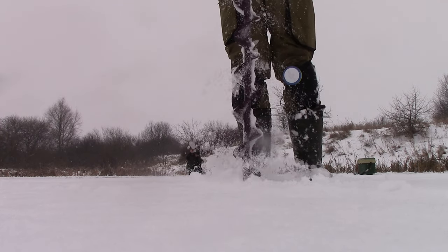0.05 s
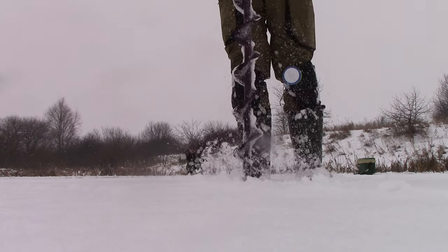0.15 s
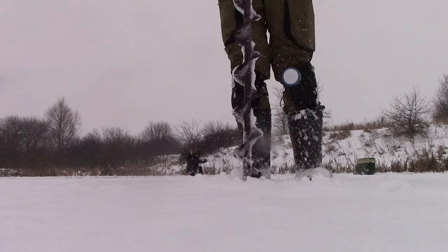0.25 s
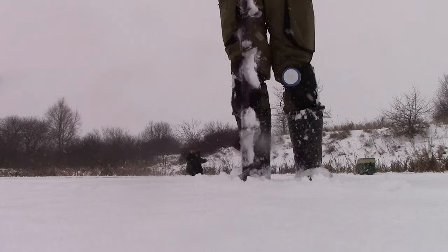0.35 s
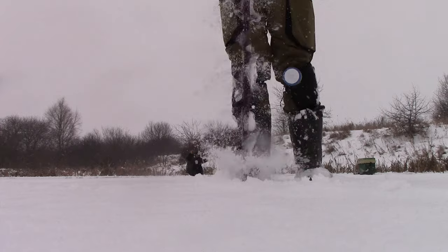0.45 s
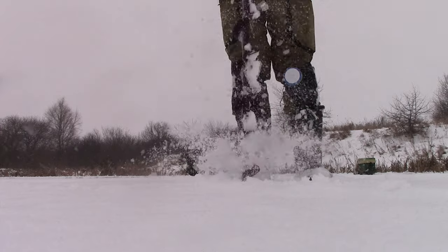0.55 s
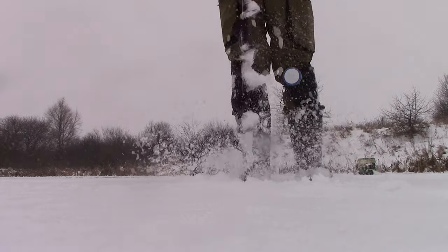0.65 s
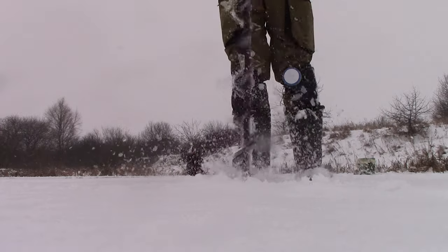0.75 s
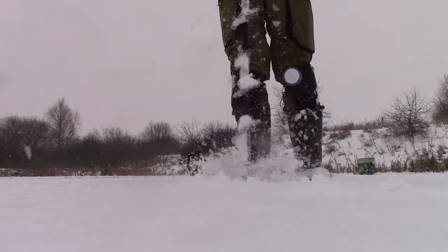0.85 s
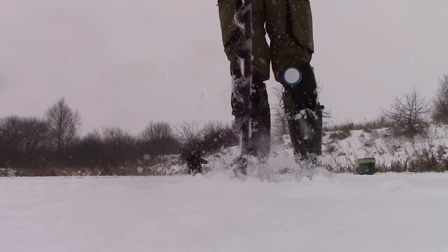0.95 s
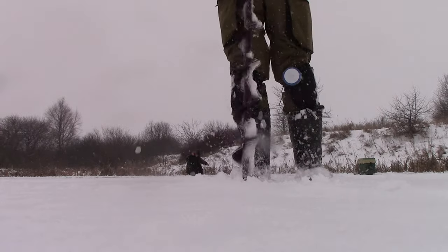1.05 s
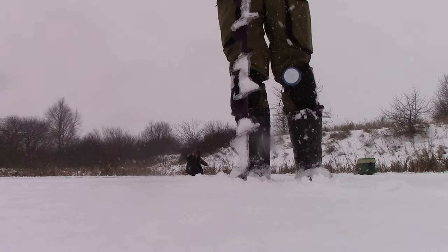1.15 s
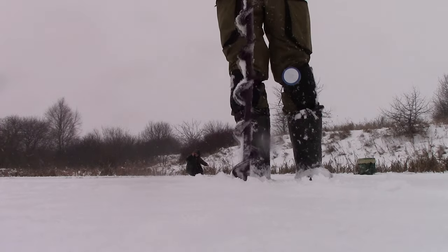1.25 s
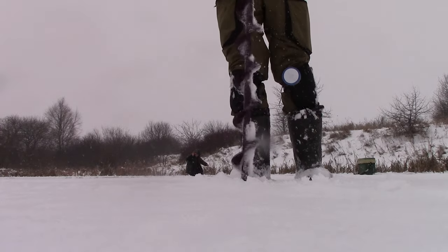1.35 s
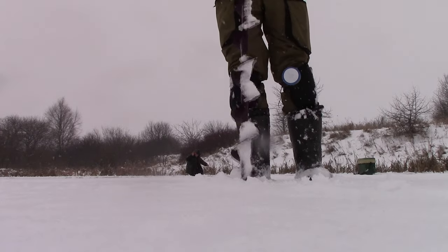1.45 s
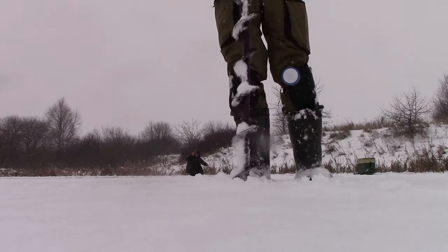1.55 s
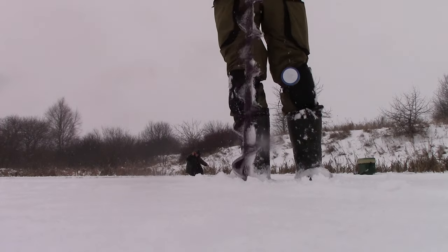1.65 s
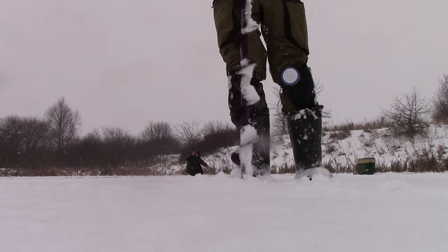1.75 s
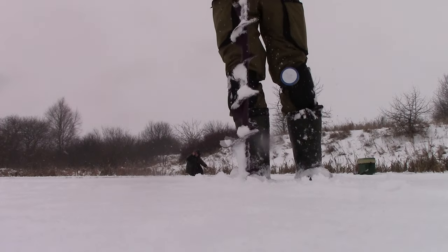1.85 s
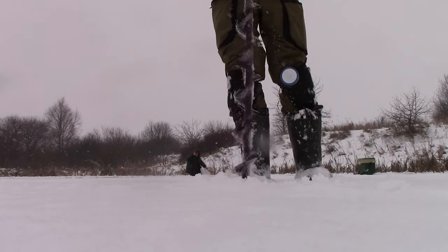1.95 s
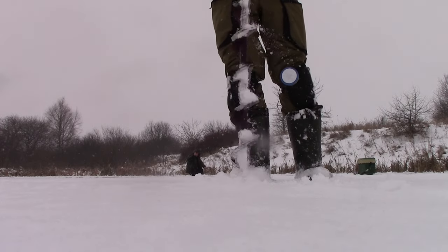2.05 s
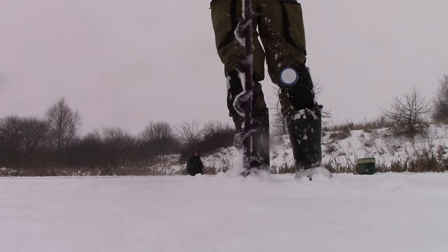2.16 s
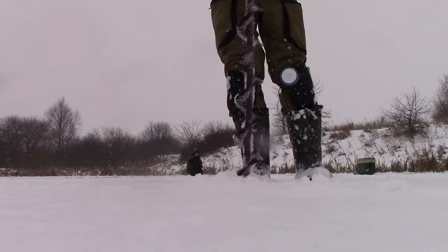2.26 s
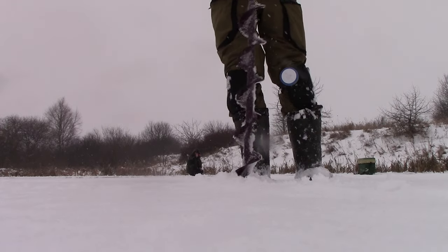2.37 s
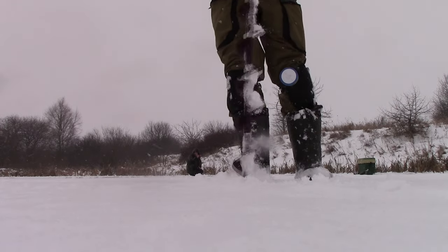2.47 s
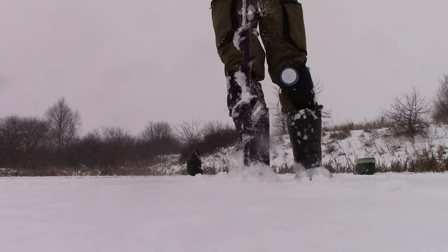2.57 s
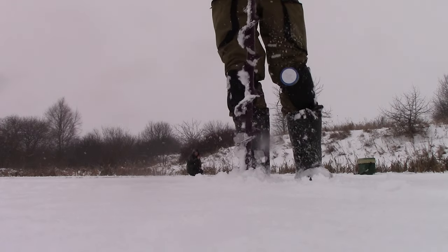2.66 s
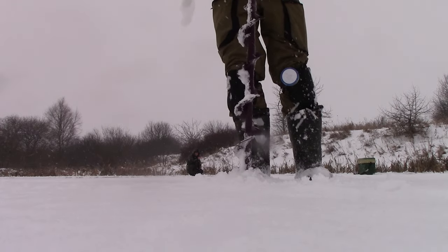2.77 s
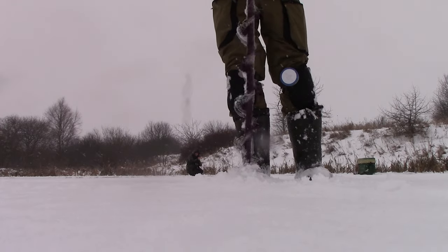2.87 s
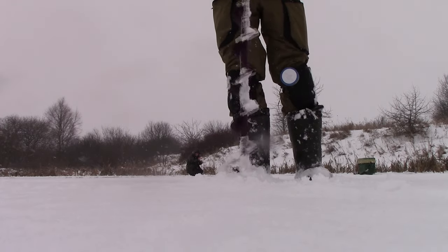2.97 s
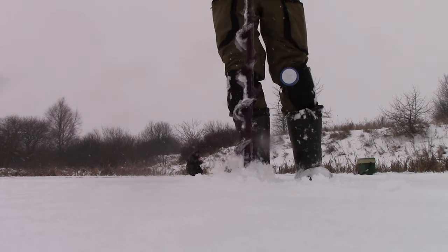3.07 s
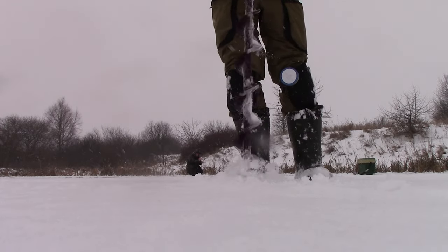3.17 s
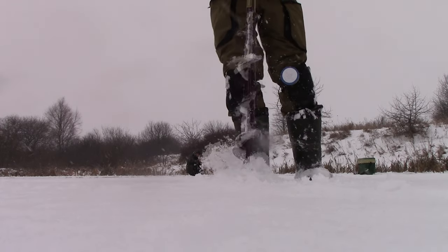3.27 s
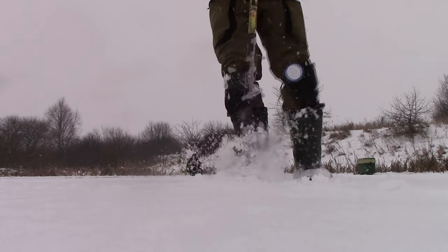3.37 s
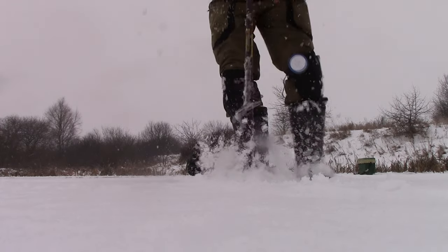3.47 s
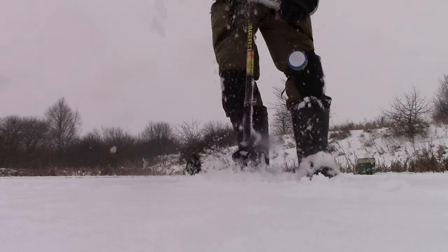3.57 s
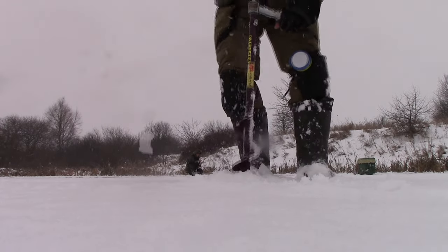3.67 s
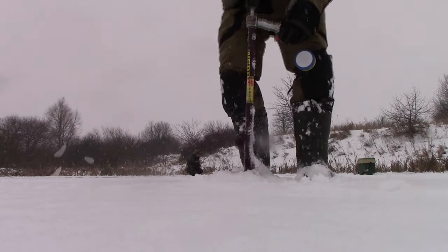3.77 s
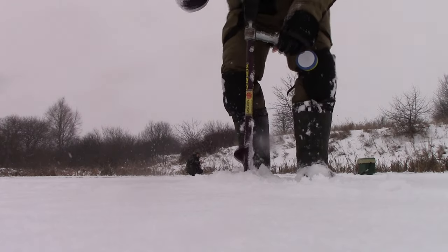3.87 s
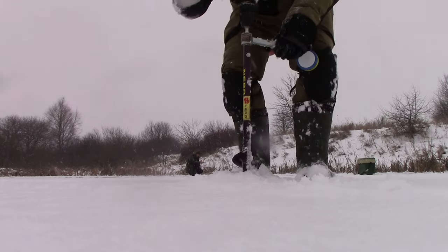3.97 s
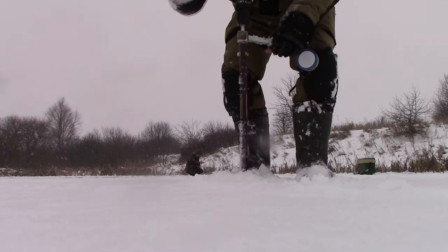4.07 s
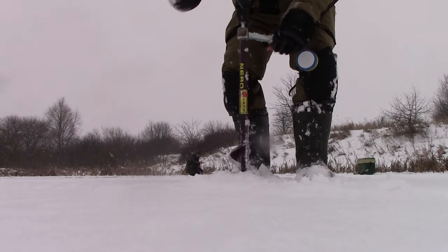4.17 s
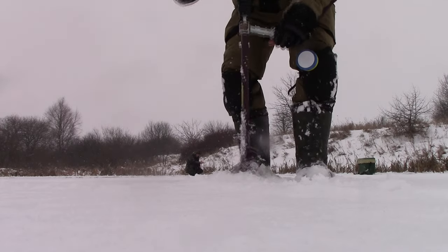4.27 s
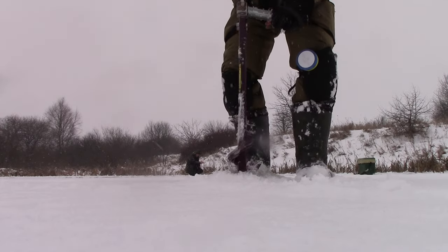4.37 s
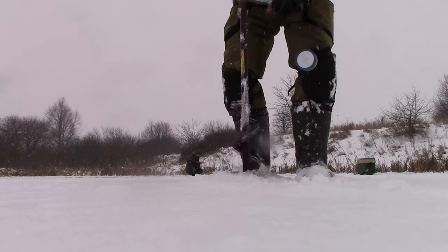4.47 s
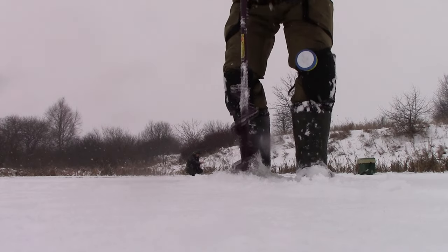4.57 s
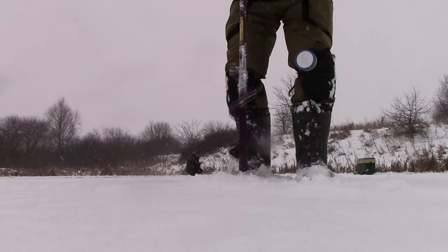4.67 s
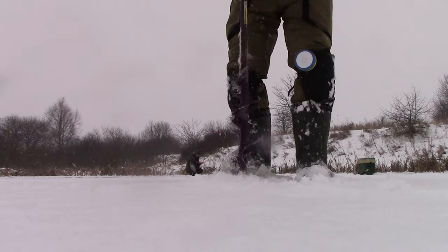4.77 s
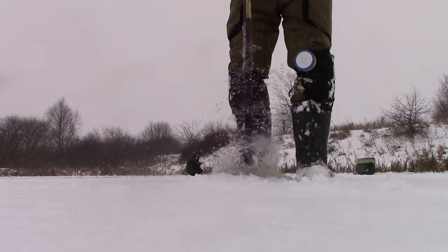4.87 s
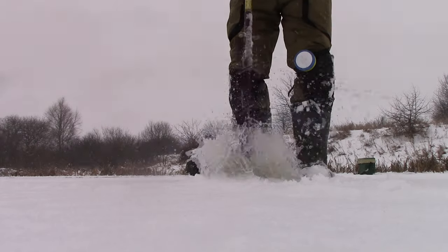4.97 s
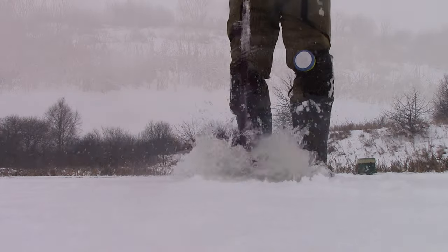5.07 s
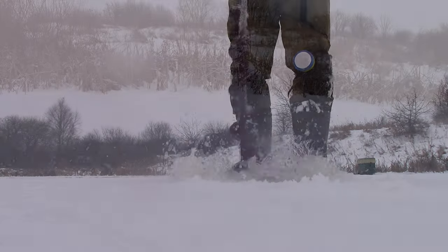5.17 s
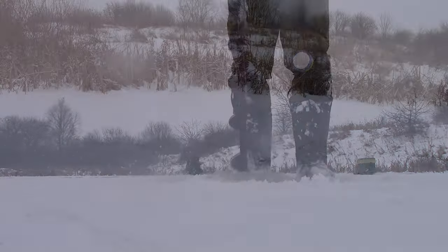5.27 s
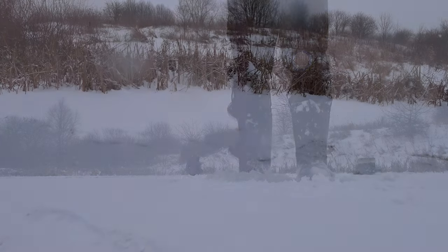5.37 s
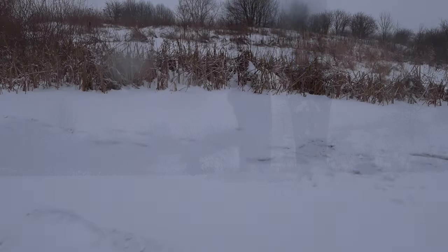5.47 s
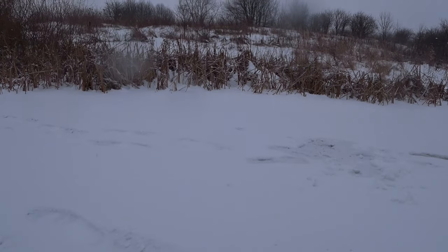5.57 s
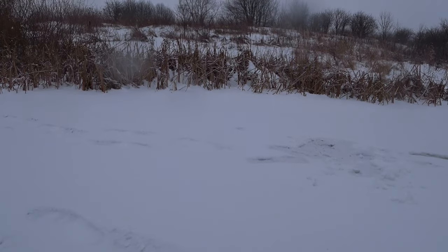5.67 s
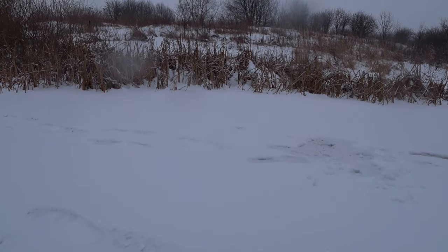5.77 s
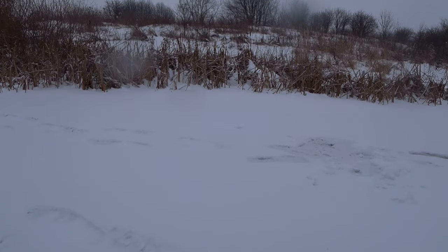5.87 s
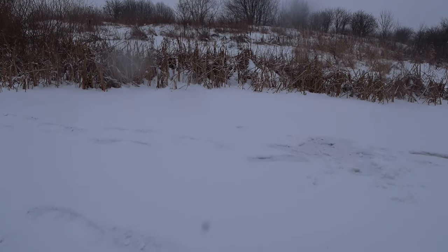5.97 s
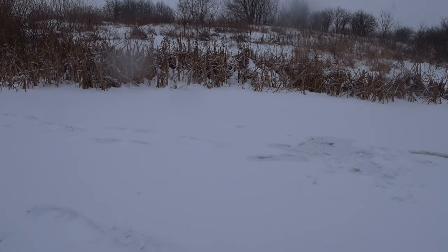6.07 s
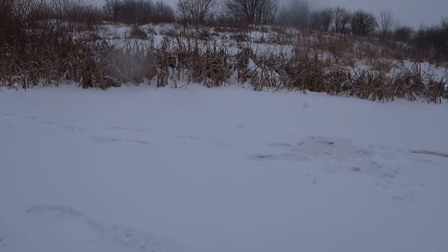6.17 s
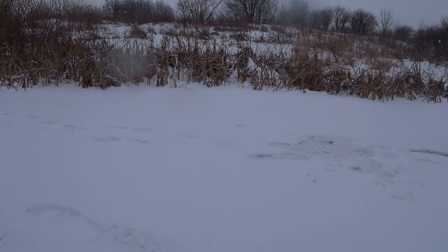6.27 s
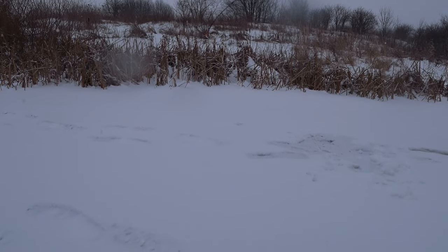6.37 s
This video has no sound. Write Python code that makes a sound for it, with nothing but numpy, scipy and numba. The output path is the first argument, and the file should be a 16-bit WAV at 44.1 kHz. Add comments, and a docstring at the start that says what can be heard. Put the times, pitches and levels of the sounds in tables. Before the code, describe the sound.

A close, dry outdoor sound on a snow-covered pond, slightly left of centre. From 0 to 0.6 s a hand auger gives short, gritty scrapes and small ticks. From about 0.65 to 2.3 s one long grinding stroke crunches through ice, swelling and easing, with steely rasp, bright tinkling chips and a growing hollow ring; a sharp crack snaps at 1.8 s. Around 2.3 to 2.6 s the blade sticks and stutters, breaking free with a hard crack near 2.5 s. After a brief lull, a final rasp runs 2.9 to 3.2 s, then breakthrough: gurgling slush, splashes, resonant glugs and a thin whistle until 3.6 s. Softer plops and sloshes continue to 4.7 s. A second strong plunge glugs and fizzes from 4.8 to 5.1 s, then dwindling splashes and slush patter until 5.5 s. Low rumble remains, with two soft wind buffets and faint snow ticks, to 6.4 s.

```python
"""A hand auger is turned in strokes into pond ice: random clicks, the chips, excite resonances of steel and hole.
A stuck blade breaks free now and then with a crack. The auger breaks through and is plunged up and down:
ringing air pockets glug, click clouds fizz through short echoes, a thin tone whistles, slush splashes on snow.
A low noise rumble rises during the last plunges and is left over the quiet pond, with two soft wind buffets
and a few ticks of snow. No reverberation is added, for snow gives no echo."""
import sys
import numpy as np
from scipy import signal
from scipy.fft import rfft, irfft
from scipy.io import wavfile
from scipy.ndimage import map_coordinates
from numba import njit

SR = 44100
rng = np.random.default_rng(int(sys.argv[2]) if len(sys.argv) > 2 else 0)


def transcribe(u):
    """Save the signal u as a 16-bit wav file named by the first command-line argument.

    u: samples, shape (n,) or (channels, n), limited to [-1, 1]; the rate is SR.
    q: integer samples, one column per channel.
    """
    v = np.clip(np.atleast_2d(u).T, -1, 1)
    q = np.round(v * 32767).astype(np.int16)
    wavfile.write(sys.argv[1], SR, q)


N = 283122
TIME = np.arange(N) / SR

# Still air over the pond, heard in both ears: (frequency_hz, density_db)
AIR_SPECTRUM = [(20, -17), (90, -20.5), (220, -1.5), (350, -4), (1000, -9), (3000, -16.5), (9000, -20.5),
                (12000, -23), (16000, -43)]
# Faint steady noise, added to the left ear and subtracted from the right: (frequency_hz, density_db)
SIDE_NOISE_SPECTRUM = [(20, -14), (90, -21), (220, -32.5), (350, -5), (2000, 1), (4000, -8), (9000, -16),
                       (16000, -28)]
# Low rumble: (frequency_hz, density_db), and its course: (time_s, gain_db)
RUMBLE_SPECTRUM = [(12, -17), (25, 5.5), (45, -1.5), (65, 2), (90, -1.5), (150, -5), (220, -6.5),
                   (300, -15), (360, -22), (1000, -27.5), (2500, -27), (6000, -28.5), (9500, -35.5),
                   (13000, -30.5), (15500, -32)]
RUMBLE_COURSE = [(4.82, -46), (4.865, -6), (5.0, -14), (5.25, -2), (5.55, 1.5), (6.42, 3.5)]
# Wind buffets: (centre_s, level_db)
WIND_BUFFETS = [(5.584, -43), (5.94, -39)]
# Snow grains ticking close by: (centre_s, level_db)
SNOW_TICKS = [(5.626, -44), (5.79, -48)]
# Level difference between the ears: (frequency_hz, left_minus_right_db)
EAR_DIFFERENCE = [(60, 4.5), (250, 3.5), (500, 2.05), (1000, 2.5), (8000, 3), (13000, 3.5)]

# Water squeezed past the screw whistles thinly: (time_s, pitch_hz, level_db)
WHISTLE_TONE = [(3.41, 2484, -60), (3.43, 3000, -39), (3.45, 3165, -38), (3.49, 3190, -41),
                (3.52, 3070, -59), (3.55, 2700, -44), (3.57, 2460, -35)]
# Lumps of thrown slush fall back on the snow: (start_s, end_s, level_db)
SPATTER_SPELLS = [(3.56, 3.678, -54), (5.24, 5.5, -48)]
# Plunges that churn the slush: (start_s, end_s, attack_s, settling_s, gurgle_db, fizz_db, grains_db,
# first_echo_spacing_hz, last_echo_spacing_hz)
PLUNGE_STROKES = [(3.194, 3.51, 0.062, 0.15, -25.5, -34.5, -36.5, 746, 800),
                  (4.049, 4.298, 0.0073, 0.036, -36.5, -46, -59, 630, 640),
                  (4.38, 4.78, 0.01, 0.03, -51.5, -65.5, -59, 500, 350),
                  (4.776, 5.051, 0.13, 0.27, -31.5, -35.5, -44, 284, 616),
                  (5.209, 5.388, 0.011, 0.027, -52, -49, -50.5, 587, 530)]
# Big air pockets closing: (start_s, level_db, pitch_hz)
AIR_POCKETS = [(3.362, -10.5, 666), (3.392, -13.5, 923), (3.403, -12, 520), (3.42, -18.5, 398),
               (3.523, -8, 609), (3.531, -12, 732), (3.735, -26.5, 606), (3.756, -32.5, 1090),
               (3.797, -31, 600), (3.796, -34, 1500), (3.946, -27.5, 595), (3.97, -32.5, 700),
               (4.027, -36.5, 667), (4.099, -23, 641), (4.152, -17.5, 793), (4.224, -19.5, 860),
               (4.239, -14.5, 914), (4.283, -19.5, 580), (4.539, -35, 513), (4.696, -29, 760),
               (4.795, -15.5, 726), (4.82, -34, 854), (4.8649, -5, 500), (4.886, -17, 1476),
               (4.891, -7.5, 950), (4.891, -14.5, 523), (4.933, -11.5, 795), (4.952, -15, 665),
               (5.009, -16, 680), (5.022, -15, 436), (5.025, -10, 850), (5.084, -17.5, 375),
               (5.1, -22.5, 353), (5.125, -28, 352), (5.168, -30, 389), (5.192, -35, 450),
               (5.238, -21.5, 580), (5.277, -22.5, 624)]
# Splashes of slush: (start_s, length_s, body_db, spray_db)
SPLASH_BURSTS = [(3.301, 0.019, -15.5, -27), (3.332, 0.015, -19, -23), (3.384, 0.046, -24.5, -35),
                 (3.521, 0.02, -26, -41), (3.546, 0.01, -30, -32), (3.586, 0.0034, -25.5, -31),
                 (3.664, 0.013, -46, -56), (3.806, 0.014, -33.5, -42), (3.878, 0.014, -37, -47),
                 (3.933, 0.019, -40.5, -55), (4.091, 0.048, -33, -44.5), (4.147, 0.021, -30.5, -40.5),
                 (4.218, 0.035, -29, -39), (4.278, 0.014, -34.5, -41.5), (4.417, 0.022, -44, -41.5),
                 (4.454, 0.027, -37.5, -48), (4.54, 0.016, -46.5, -53), (4.604, 0.0075, -49.5, -54),
                 (4.647, 0.0087, -54, -54), (4.689, 0.012, -45.5, -44.5), (4.787, 0.011, -31, -31.5),
                 (4.851, 0.017, -22.5, -22), (4.879, 0.017, -26, -30.5), (4.9286, 0.0046, -27, -16),
                 (4.946, 0.026, -28, -28), (5.003, 0.011, -28.5, -28), (5.0192, 0.014, -21, -21),
                 (5.0539, 0.0096, -20.5, -21), (5.084, 0.0059, -38, -35), (5.113, 0.0097, -50, -49),
                 (5.165, 0.0073, -35.5, -34.5), (5.22, 0.0067, -16.5, -34.5), (5.268, 0.017, -29, -44.5),
                 (5.313, 0.015, -33, -49), (5.447, 0.0071, -38.5, -41), (5.503, 0.014, -42, -43.5)]
# Spectra of moving water, of spray and of fizz: (frequency_hz, density_db)
SLOSH_SPECTRUM = [(30, -38.5), (60, -77), (150, -22.5), (250, -8.5), (380, 2), (600, 2.5), (900, 3),
                  (1400, 1), (2200, -12), (3600, -10), (5200, -18), (8000, -20.5), (16000, -36)]
SPRAY_SPECTRUM = [(300, -60.5), (3500, -2), (5200, -15), (7000, -4), (8600, 2.5), (9500, 1.5), (10400, 0),
                  (12000, -8.5), (14000, -26), (16000, -39)]
FIZZ_SPECTRUM = [(100, -55), (800, -18), (1400, -8), (1900, 1.5), (2900, 0), (3700, -5.5), (5200, -12),
                 (7500, -10.5), (16000, -51)]

# Single cracks of the ice under a sticking blade: (start_s, level_db)
ICE_CRACKS = [(0.138, -35.5), (0.194, -29), (0.302, -35.5), (0.57, -21), (1.776, -3), (2.317, -19),
              (2.339, -8), (2.424, -12), (2.432, -18), (2.441, -17), (2.449, -16), (2.471, -15),
              (2.489, -1.5), (2.773, -31)]
# Strokes of the blades, biting or just rubbing: (start_s, end_s, attack_s, level_db, swell_db_per_s,
# treble_relative_db)
BLADE_STROKES = [(0.0, 0.08, 0.001, -30.5, 51, -1.5), (0.351, 0.541, 0.079, -26.5, 35, -2),
                 (0.574, 0.647, 0.017, -44, -47, -4.5), (0.657, 2.294, 0.055, -26, 0, -3),
                 (2.299, 2.329, 0.01, -33.5, -10, -14), (2.336, 2.385, 0.0026, -26, -10, -7),
                 (2.39, 2.49, 0.0077, -35.5, -40, -5.5), (2.49, 2.629, 0.0023, -20.5, -29, -1.5),
                 (2.669, 2.764, 0.025, -44.5, -65, -5), (2.875, 3.216, 0.073, -23, 0.5, -1)]
# Pressure on the auger through the long stroke: (time_s, gain_db)
AUGER_PRESSURE = [(0.66, -1.5), (0.75, 3.5), (0.88, 5.5), (1.03, -1.5), (1.35, -1), (1.62, -2), (1.69, 4),
                  (1.86, -4), (2.04, 4), (2.22, 0), (2.33, -5.5)]
# Hole and ice sheet ring once the blades are deep enough: (time_s, hole_pitch_hz, hole_db, boom_db)
HOLE_COURSE = [(0.8, 720, -23, -19.5), (1.15, 742, -7, -13.5), (1.6, 737, -3, -14.5),
               (2.6, 650, -7.5, -16.5), (3.2, 665, -6, -15)]
# Resonances of the steel shaft and spiral, and of the blades themselves: (centre_hz, width_hz, level_db)
SHAFT_MODES = [(1161, 195, 1), (1333, 120, -4.5), (1560, 137, -0.5), (1694, 72, -2.5), (1880, 290, 3.5),
               (2204, 120, -12.5), (2685, 180, -4), (3043, 130, -4.5), (4620, 520, -4)]
BLADE_MODES = [(3543, 57, -0.5), (3690, 470, 5.5), (3780, 240, -5)]
# Spectra of breaking chips, of bright splinters and of the booming ice sheet: (frequency_hz, density_db)
CHIP_SPECTRUM = [(100, -40.5), (300, -13.5), (460, -7), (600, 0.5), (1000, 0.5), (1700, 1.5), (2300, -0.5),
                 (3200, -1), (4300, -5), (5300, -10), (7000, -32)]
SPLINTER_SPECTRUM = [(300, -89), (4000, -48.5), (5400, -9.5), (6600, -1), (8200, 2), (10000, 2),
                     (11200, -6), (12500, -14.5), (14000, -22), (16000, -42.5)]
BOOM_SPECTRUM = [(50, -54), (100, -39), (165, -10), (280, 0.5), (380, 1.5), (460, -10), (900, -44.5)]

BITE_POWER = 1.27  # exponent of the attack: the blades dig in slowly at first
RELEASE_S = 0.0079  # and let go quickly
TREBLE_DB_PER_S, BLADE_DB_PER_S = -1.06, -2.5  # the treble and the blade ring sink with the auger
BLADE_START_DB = -4.5  # blade ring at time 0, relative to the stroke
GURGLE_ATTACK_S, FIZZ_RELEASE_S, GRAIN_RELEASE_S = 0.027, 0.028, 0.1
ECHO_SHARE = 0.46  # of the fizz amplitude that returns from each bounce
GLUG_CYCLES = 26.8  # 60 dB decay in periods of the starting pitch, so low pockets last longer
CUTOFF_HZ = 15900


def undb(db):
    """Logarithmic level: decibels to amplitude gain."""
    return 10 ** (np.asarray(db) / 20)


def unit(x):
    """Power normalisation: scale to rms 1."""
    return x / np.sqrt(np.mean(x ** 2) + 1e-20)


def curve(rows):
    """Linear interpolation: each column after the time, at every sample."""
    seconds, *columns = np.transpose(rows)
    return [np.interp(TIME, seconds, column) for column in columns]


def during(start, end, fade=0.0095):
    """Gating: 1 between two times, 0 outside, with short ramps in seconds."""
    fade_in = np.clip((TIME - start) / fade + 1, 0, 1)
    fade_out = np.clip((end - TIME) / fade + 1, 0, 1)
    return fade_in * fade_out


def envelope(start, end, attack, release, power=1):
    """Attack and exponential decay: rise from `start`, hold until `end`, then die away."""
    rise = np.clip((TIME - start) / attack, 0, 1) ** power
    return rise * np.exp(-np.maximum(TIME - end, 0) / release)


def add(track, seconds, sound):
    """Superposition: mix a short sound into the track at a given time."""
    start = int(np.clip(seconds * SR, 0, N - 1))
    track[start:start + len(sound)] += sound[:N - start]


def colour(x, spectrum):
    """Minimum-phase filtering: a folded cepstrum turns a gain curve into a causal response."""
    hz, db = np.transpose(spectrum)
    bins_hz = np.maximum(np.arange(2049) * SR / 4096, 1)
    gain = undb(np.interp(np.log(bins_hz), np.log(hz), db))
    cepstrum = irfft(np.log(gain))
    half = len(cepstrum) // 2
    cepstrum[1:half] *= 2
    cepstrum[half + 1:] = 0
    response = irfft(np.exp(rfft(cepstrum)))
    return signal.oaconvolve(x, response)[:N]


def shaped(x, spectrum):
    """Power-preserving filtering: colour a white sound, keeping its power."""
    filter_norm = np.linalg.norm(colour(signal.unit_impulse(N), spectrum))
    return colour(x, spectrum) / filter_norm


@njit
def resonate(x, hz, width):
    """Simple resonance: a state-variable band-pass with a moving centre."""
    out, band, low = np.empty(len(x)), 0., 0.
    for i in range(len(x)):
        g, damping = np.tan(np.pi * hz[i] / SR), width / hz[i]
        v = (band + g * (x[i] - low)) / (1 + g * (g + damping))
        band, low, out[i] = 2 * v - band, low + 2 * g * v, damping * v
    return out


def walk(rate):
    """Smooth random fluctuation: spread near 1, changing `rate` times a second."""
    knots = rng.standard_normal(N // 8)
    return map_coordinates(knots, [TIME * rate], order=2, mode="wrap")


def ring(x, hz, width, wander=0.017):
    """Cascaded resonance: two equal band-passes whose centre wanders as the auger turns and rubs, rms 1."""
    centre_hz = hz * (1 + wander * walk(9))
    once = resonate(x, centre_hz, float(width))
    return unit(resonate(once, centre_hz, float(width)))


def crackle(rate, spread_db):
    """Random impulse process: `rate` clicks a second of uneven size and random sign, rms 1."""
    hit = rng.random(N) < rate / SR
    size = undb(spread_db * np.clip(rng.standard_normal(N), -2, 2))
    sign = np.sign(rng.standard_normal(N))
    return unit(hit * size * sign)


def bubble(hz, t60, glide, attack):
    """Bubble resonance: a decaying sine, its pitch climbing with `glide` as the pocket nears the surface."""
    t = np.arange(int(t60 * SR) + 2) / SR
    phase = 2 * np.pi * hz * (t + glide * t * t / (2 * t60))
    onset = 1 - np.exp(-(t / attack) ** 2)
    swell = onset * np.exp(-np.log(1000) * t / t60)
    return np.sin(phase) * swell / swell.max()


def bubbles(count, low_hz, high_hz, cycles, glide, spread_db):
    """Superposed decaying pings at random times: small bubbles, or ice flakes when glide is 0; rms 1."""
    out = np.zeros(N)
    for when, pitch, size, life in rng.random((count, 4)):
        hz = low_hz * (high_hz / low_hz) ** pitch
        t60 = cycles * (.5 + life) / hz
        add(out, when * N / SR, undb(spread_db * size) * bubble(hz, t60, glide, attack=t60 / 20))
    return unit(out)


def patchy(x, spread_db, band_hz, rate, full_hz=1300):
    """Time-frequency modulation: narrow bands swell and fade separately, less so towards the bass."""
    f, t, z = signal.stft(x, SR, nperseg=512, noverlap=384)
    places = np.meshgrid(f / band_hz, t * rate, indexing="ij")
    field = map_coordinates(rng.standard_normal((256, 1024)), places, order=2, mode="mirror")
    depth = np.minimum(f / full_hz, 1)[:, None]
    gain = undb(spread_db * depth * field)
    gain /= np.sqrt(np.mean(gain ** 2, axis=1, keepdims=True))
    return signal.istft(z * gain, SR, nperseg=512, noverlap=384)[1][:N]


def outdoors():
    """Broadband noise: faint still air, then a low rumble with slow wind pulses and short ticks of snow."""
    rise_db, = curve(RUMBLE_COURSE)
    air = undb(-61.5) * shaped(rng.standard_normal(N), AIR_SPECTRUM)
    rumble_gain = undb(-53 + rise_db + 1.2 * walk(8.6))
    rumble = rumble_gain * shaped(rng.standard_normal(N), RUMBLE_SPECTRUM)
    for centre, db in WIND_BUFFETS:
        pulse = np.exp(-((TIME - centre) / 0.019) ** 2)
        rumble += undb(db) * pulse * np.sin(2 * np.pi * 24 * (TIME - centre))
    ticks = sum(undb(db) * np.exp(-np.abs(TIME - centre) / 0.0006) for centre, db in SNOW_TICKS)
    return air + rumble + shaped(ticks * rng.standard_normal(N), SPRAY_SPECTRUM)


def whistle():
    """Frequency modulation: a thin unsteady tone as the auger is pulled up through the water."""
    hz, db = curve(WHISTLE_TONE)
    unsteady_hz = hz * (1 + 0.0126 * walk(330))
    tone = unit(np.sin(2 * np.pi * np.cumsum(unsteady_hz) / SR))
    return tone * undb(db + 2 * walk(120)) * during(WHISTLE_TONE[0][0], WHISTLE_TONE[-1][0])


def spatter(rate=70, decay=0.0018):
    """Random impacts with exponential decay: small wet lumps land, each a short crisp pat."""
    impacts = np.abs(crackle(rate=rate, spread_db=9.5))
    pats = signal.lfilter([1], [1, -np.exp(-1 / (decay * SR))], impacts)
    pats = unit(pats * rng.standard_normal(N))
    falling = sum(undb(db) * envelope(start, end, 0.02, 0.04) for start, end, db in SPATTER_SPELLS)
    wet = undb(-2.5) * shaped(pats, FIZZ_SPECTRUM) + undb(-6.5) * shaped(pats, SPRAY_SPECTRUM)
    return falling * patchy(wet, spread_db=5.5, band_hz=410, rate=55)


def reflect(x, spacing_hz):
    """Comb interference: echoes across the changing gap of water and auger, their treble lost in slush."""
    dull = signal.sosfiltfilt(signal.butter(2, 6000, fs=SR, output="sos"), x)
    echoes = sum(ECHO_SHARE ** k * np.interp(TIME - k / spacing_hz, TIME, dull) for k in range(1, 4))
    return (x + echoes) / np.sqrt(1 + ECHO_SHARE ** 2)


def churn():
    """Bubble clouds and impulse noise: stirred slush gurgles and fizzes, and loose ice grains hiss on top."""
    gurgle = undb(-6.5) * bubbles(count=1300, low_hz=418, high_hz=1560, cycles=23.4, glide=0.49, spread_db=23)
    gurgle += undb(-7) * shaped(crackle(rate=2200, spread_db=5), SLOSH_SPECTRUM)
    fizz = undb(0.5 + 1.0 * walk(90)) * shaped(crackle(rate=6000, spread_db=1), FIZZ_SPECTRUM)
    grains = undb(-4.5 + 3.9 * walk(49)) * shaped(crackle(rate=2000, spread_db=3), SPRAY_SPECTRUM)
    out = np.zeros(N)
    for start, end, attack, settling, gurgle_db, fizz_db, grains_db, first_hz, last_hz in PLUNGE_STROKES:
        out += undb(gurgle_db) * gurgle * envelope(start, end, GURGLE_ATTACK_S, settling)
        spacing_hz = np.interp(TIME, [start, end], [first_hz, last_hz])
        out += undb(fizz_db) * reflect(fizz, spacing_hz) * envelope(start, end, attack, FIZZ_RELEASE_S)
        out += undb(grains_db) * grains * envelope(start, end, attack, GRAIN_RELEASE_S)
    return out


def glugs():
    """Bubble resonance: big air pockets ring briefly; the thick slush shakes their level and pitch."""
    out = np.zeros(N)
    for start, db, hz in AIR_POCKETS:
        add(out, start, undb(db) * bubble(hz, GLUG_CYCLES / hz, glide=.2, attack=0.0028))
    shaken = np.interp(TIME + .0001 * walk(260), TIME, out)  # uneven delay shakes the pitch
    return shaken * undb(1.3 * walk(350))


def splashes(rise=0.0013, body_tail=0.0075, spray_tail=0.0031):
    """Bursts of drop impacts: a dull slap full of tiny bubbles, with a bright spray on top."""
    body, spray = np.zeros(N), np.zeros(N)
    t = np.arange(SR // 6) / SR
    for start, length, body_db, spray_db in SPLASH_BURSTS:
        onset, past = np.minimum(t / rise, 1), np.maximum(t - length, 0)
        add(body, start, undb(body_db) * onset * np.exp(-past / body_tail))
        add(spray, start, undb(spray_db) * onset * np.exp(-past / spray_tail))
    slap = shaped(body * crackle(rate=2800, spread_db=5), SLOSH_SPECTRUM)
    froth = body * bubbles(count=4000, low_hz=800, high_hz=4110, cycles=30.6, glide=0.19, spread_db=1)
    mist = bubbles(count=5000, low_hz=5120, high_hz=11770, cycles=41, glide=0.027, spread_db=4)
    droplets = crackle(rate=7000, spread_db=0) + undb(-9) * mist
    flutter = unit(undb(4.5 * walk(250)))
    drops = shaped(spray * droplets * flutter, SPRAY_SPECTRUM)
    mix = undb(-1.5) * slap + undb(-3.5) * froth + undb(-0.5) * drops
    return patchy(mix, spread_db=4.5, band_hz=330, rate=40)


def cracks(decay=0.0012):
    """Brittle fracture: a stuck blade breaks free in a few milliseconds of splintering."""
    bursts = np.zeros(N)
    burst = np.exp(-np.arange(SR // 20) / SR / decay)
    for start, db in ICE_CRACKS:
        add(bursts, start, undb(db) * burst)
    splinters = bursts * crackle(rate=6200, spread_db=6)
    body = undb(-9.5) * shaped(splinters, CHIP_SPECTRUM)
    return body + undb(-15.5) * shaped(splinters, SPLINTER_SPECTRUM)


def cutting():
    """Amplitude control by cutting force: body and treble gains as strokes dig in, swell or sag, and let go."""
    body, treble = np.zeros(N), np.zeros(N)
    for start, end, attack, db, swell, treble_db in BLADE_STROKES:
        stroke_db = db + swell * (np.clip(TIME, start, end) - start)
        stroke = envelope(start, end, attack, RELEASE_S, BITE_POWER) * undb(stroke_db)
        body += stroke
        treble += stroke * undb(treble_db)
    # no extra pressure before or after the long stroke
    pressure = undb(np.interp(TIME, *np.transpose(AUGER_PRESSURE), left=0, right=0))
    return body * pressure, treble * pressure * undb(TREBLE_DB_PER_S * TIME)


def ring_modes(modes, slips):
    """Modal synthesis: slipping clicks drive each resonance of the steel, and the modes sum to rms 1."""
    total = np.zeros(N)
    for hz, width, db in modes:
        total += undb(db) * ring(crackle(rate=2500, spread_db=4.5) * slips, hz, width)
    return unit(total)


def blades():
    """Stick-slip excitation: blades catch and slip, and showers of chips ring the steel, ice sheet and hole."""
    body_gain, treble_gain = cutting()
    hole_hz, hole_db, boom_db = curve(HOLE_COURSE)
    slips = unit(undb(1.16 * walk(260) + 0.79 * walk(70)))
    chips = crackle(rate=5000, spread_db=1) * slips
    hole = ring(crackle(rate=2700, spread_db=4.5) * slips, hole_hz, 224)
    boom = shaped(crackle(rate=3000, spread_db=1) * slips, BOOM_SPECTRUM)
    body = undb(-4) * shaped(chips, CHIP_SPECTRUM)
    body += undb(-6.5) * ring_modes(SHAFT_MODES, slips)
    body += undb(BLADE_START_DB + BLADE_DB_PER_S * TIME) * ring_modes(BLADE_MODES, slips)
    body += undb(hole_db) * hole + undb(boom_db) * boom
    # thin flakes tinkle, each at a pitch of its own
    flakes = bubbles(count=5000, low_hz=4890, high_hz=12700, cycles=190, glide=0, spread_db=6.5)
    treble = shaped(undb(-2.5) * chips + undb(-10.5) * flakes * slips, SPLINTER_SPECTRUM)
    return patchy(body * body_gain + treble * treble_gain, spread_db=2.5, band_hz=257.5, rate=35)


def scene():
    """Interaural level difference: all sources a little to the left, plus faint steady noise opposed in sign."""
    water = churn() + splashes() + spatter() + glugs()
    # a narrow hole radiates no deep bass
    water = signal.sosfilt(signal.butter(2, 90, "high", fs=SR, output="sos"), water)
    mid = outdoors() + whistle() + water + cracks() + blades()
    left = colour(mid, [(hz, db / 2) for hz, db in EAR_DIFFERENCE])
    right = colour(mid, [(hz, -db / 2) for hz, db in EAR_DIFFERENCE])
    side_noise = undb(-67) * shaped(rng.standard_normal(N), SIDE_NOISE_SPECTRUM)
    return np.array([left + side_noise, right - side_noise])


def record(dry):
    """Band limitation: a steep elliptic low-pass removes the top of the spectrum."""
    return signal.sosfilt(signal.ellip(10, .1, 80, CUTOFF_HZ, fs=SR, output="sos"), dry)


dry = scene()
out = record(dry)
transcribe(out)
```